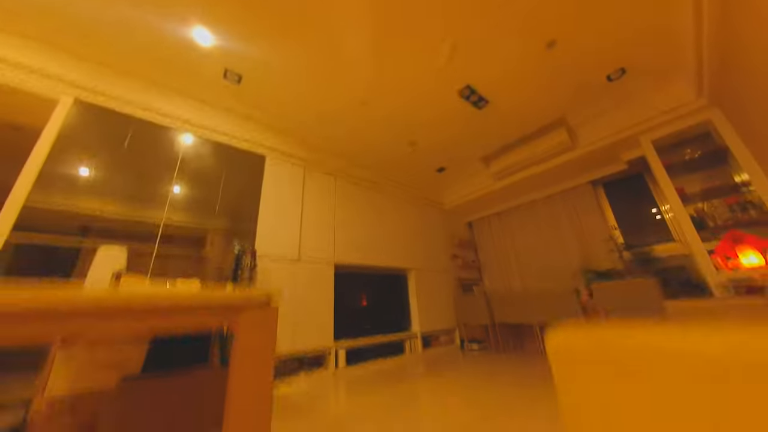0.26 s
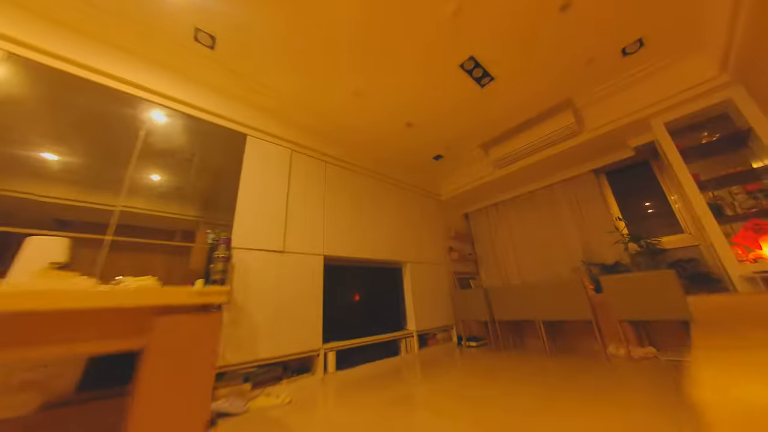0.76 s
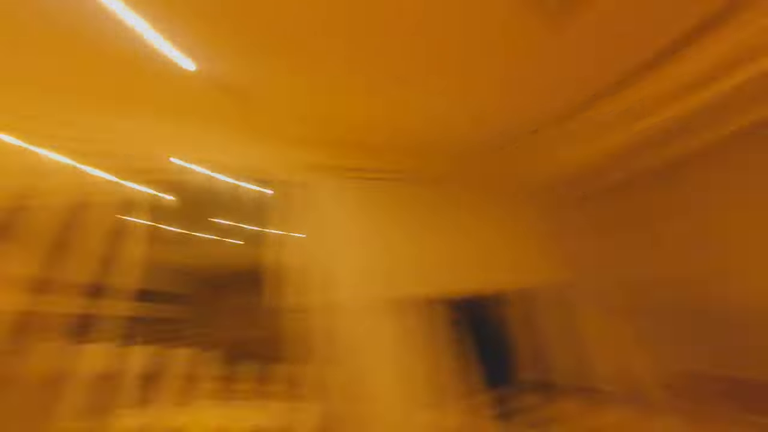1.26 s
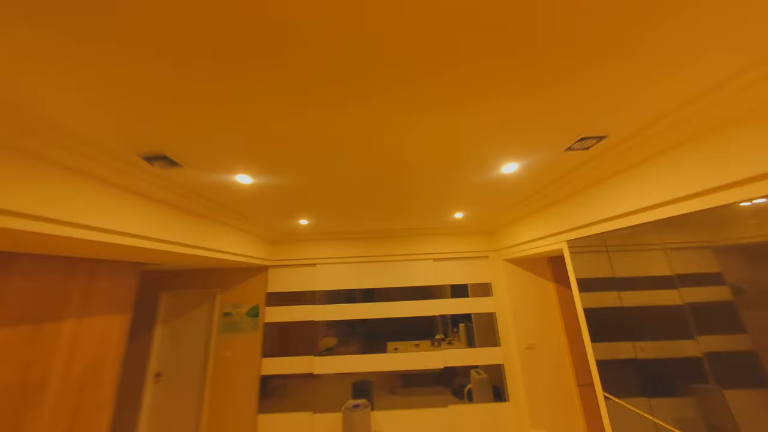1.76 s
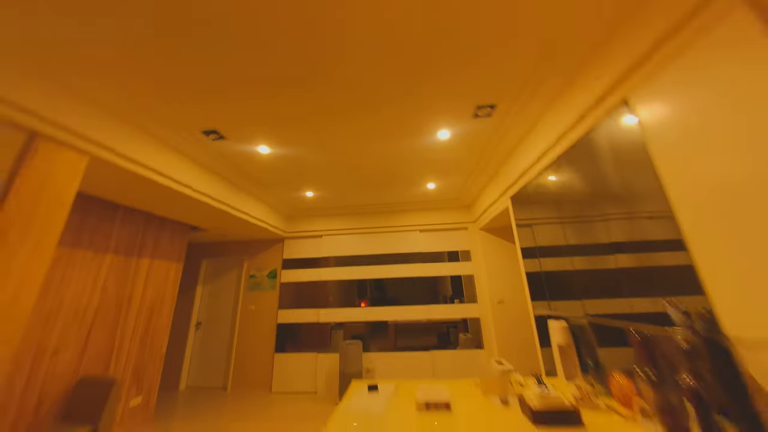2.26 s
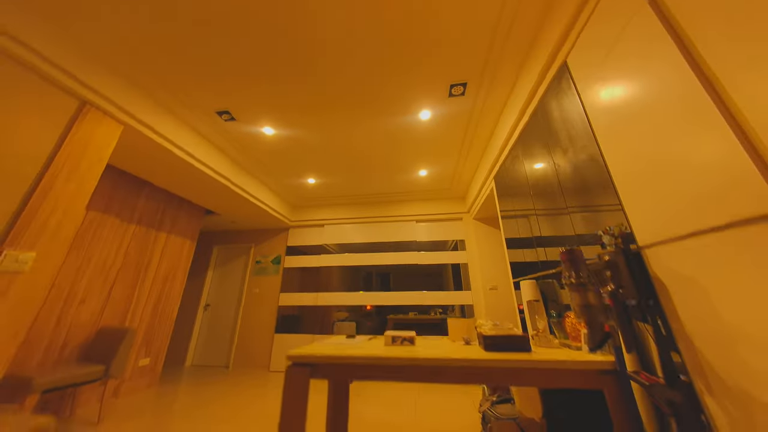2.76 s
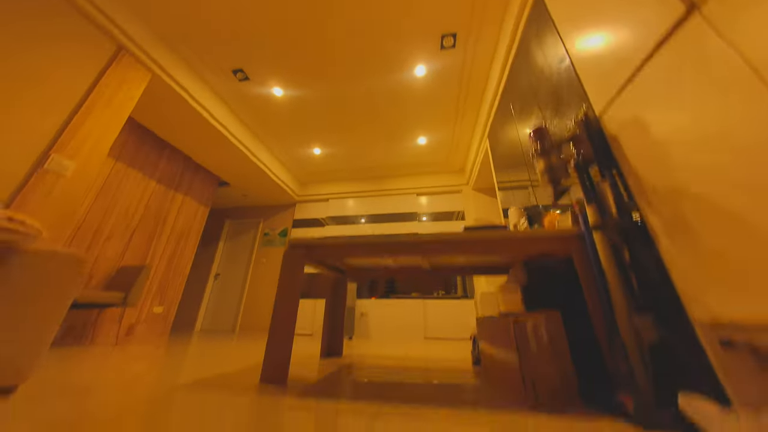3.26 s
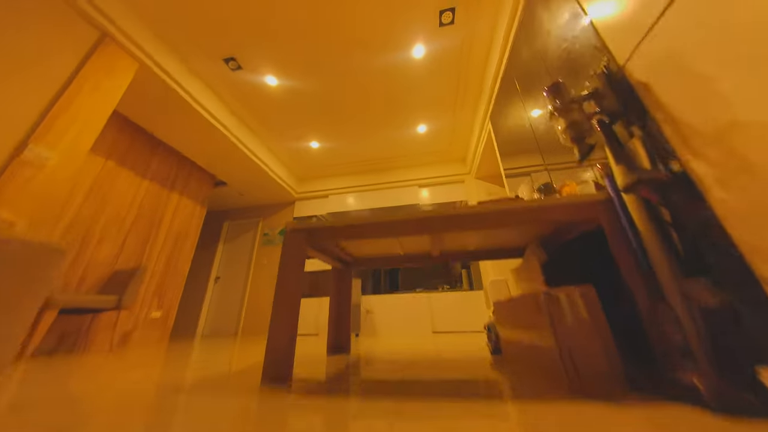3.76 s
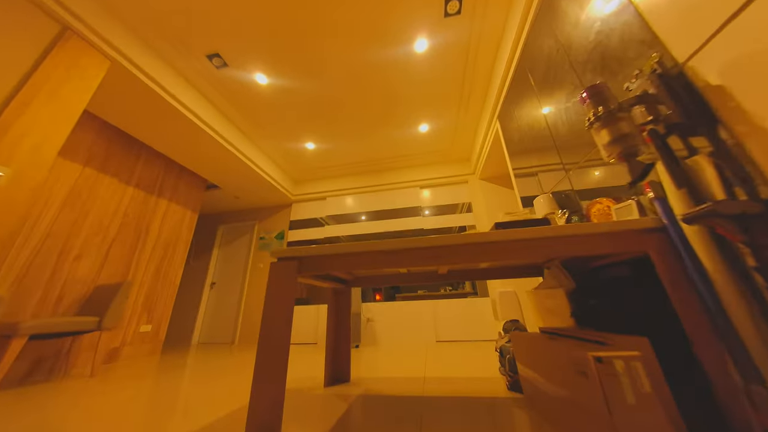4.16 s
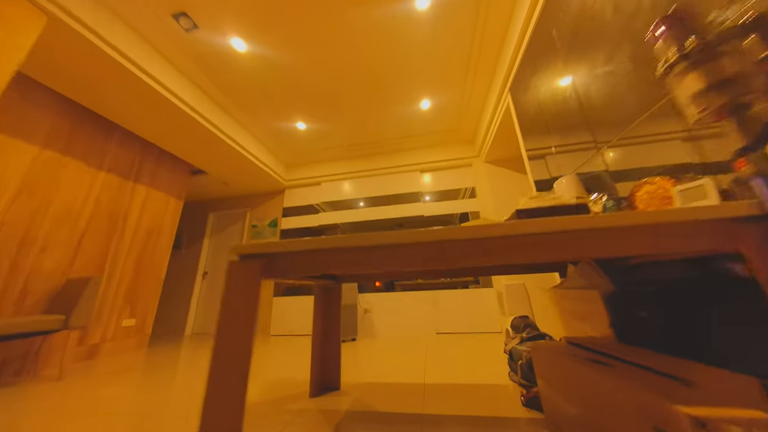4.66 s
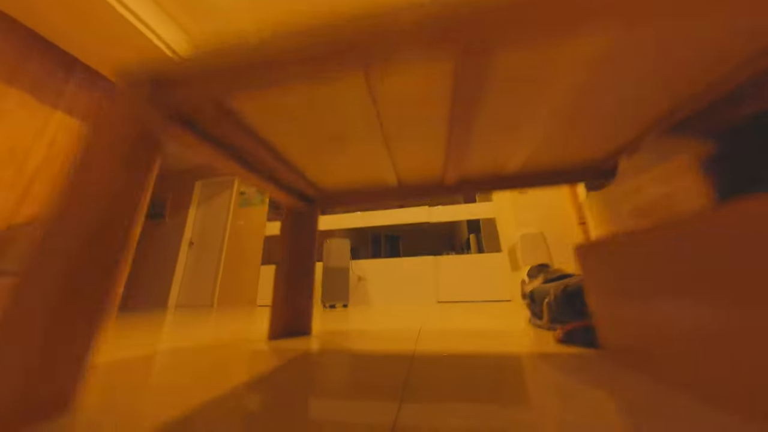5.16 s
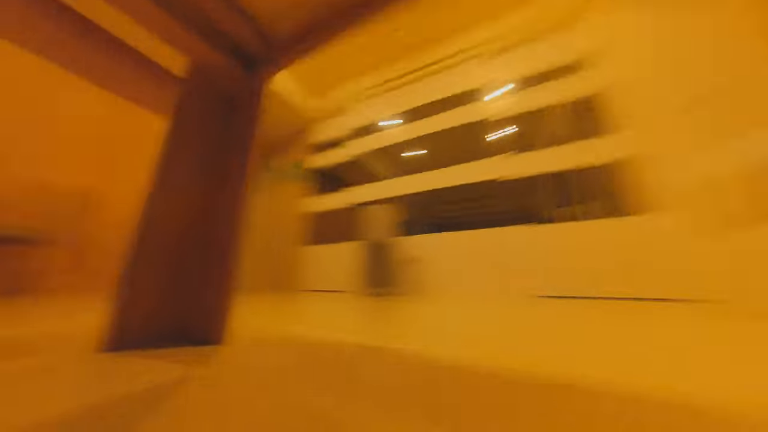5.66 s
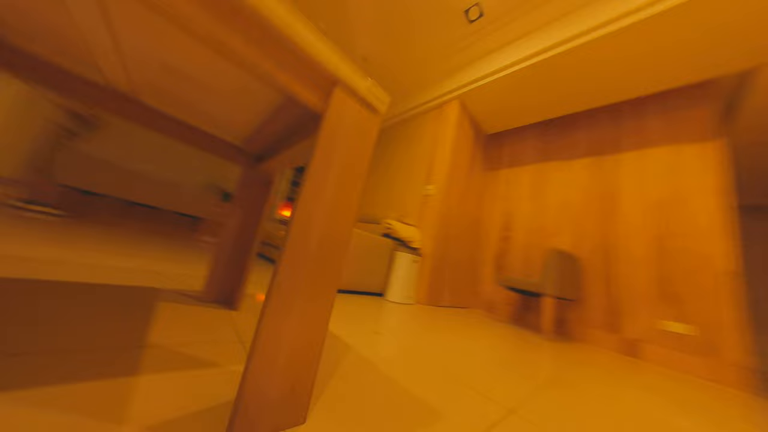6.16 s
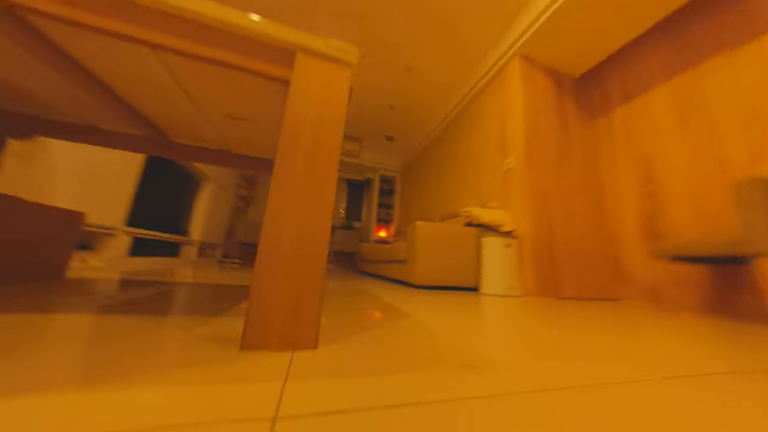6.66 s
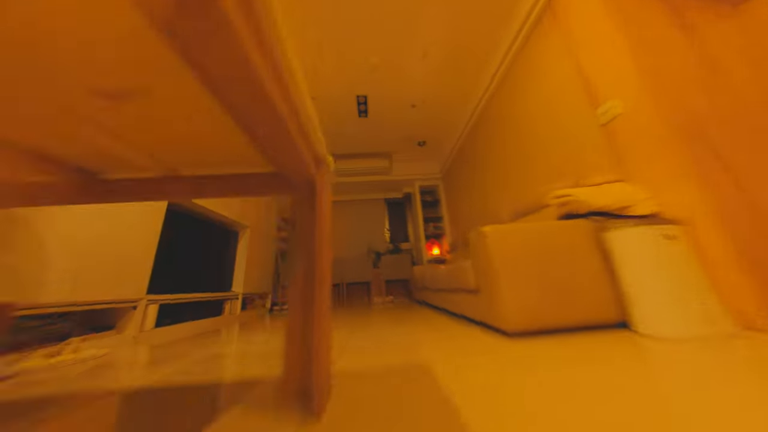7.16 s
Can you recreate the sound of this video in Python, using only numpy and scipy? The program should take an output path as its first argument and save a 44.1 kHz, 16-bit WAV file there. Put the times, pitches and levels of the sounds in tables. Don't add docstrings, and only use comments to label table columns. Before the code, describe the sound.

Close, overloaded propeller whine from a little indoor drone surges, beats and dips, with a throttle cut early on and gusty air rumble.

```python
import sys
import numpy as np
from scipy import signal
from scipy.fft import rfft, irfft
from scipy.io import wavfile
from scipy.ndimage import uniform_filter1d

SR = 44100
rng = np.random.default_rng(int(sys.argv[2]) if len(sys.argv) > 2 else 0)


def rack_gain(trim_db):
    fader = np.asarray(trim_db, float)
    return 10 ** (fader / 20)


def persist_wave(psi):
    counts = np.round(np.clip(psi, -1, 1) * 32767).astype(np.int16)
    wavfile.write(sys.argv[1], SR, np.atleast_2d(counts).T)


N = 326340

# one row of (bite in blade tone, sharpness
# in second harmonic, in third, bite in hiss, in bright fizz) [dB per dB]
BITE_SHARES = (0.3, 0.32, 1.2, 0.84, -0.34)


def rotor_pair(hz, third, bite_db, sharp_db, shake, gains_db, mate_db, apart, high_db):
    # (frequency [Hz], level [dB])
    tone = [(190, -35.5), (270, -29.5), (400, -29), (520, -23), (750, -17.5), (1000, -17), (1400, -12.5)]
    # (frequency [Hz], level [dB])
    ring = [(600, -57), (950, -25.5), (1200, -20.5), (1550, -12), (1950, -14.5), (2650, -30), (3300, -14),
            (4800, -12)]
    load_db_s = (-0.07, 0.3, 0.22)
    laws = (at_hz(tone, hz), at_hz(ring, 2 * hz), at_hz(third, 3 * hz))
    loading_db = (bite_db, sharp_db, sharp_db)
    unrest_db = (1.2, 1.8, 1.8)
    levels_db = []
    for k, law in enumerate(laws):
        level_db = law + gains_db[k] + BITE_SHARES[k] * loading_db[k]
        level_db = level_db + load_db_s[k] * surge(hz) + unrest_db[k] * drift(5.9)
        levels_db.append(level_db)
    off_db = -16.5 * np.abs(np.log2(hz / 800))
    near, phase = rotor(hz, *levels_db, wobble=.005 * shake, flutter_db=1.5,
                        high_db=high_db + .6 * sharp_db, fall_db=1.5, shaft_db=off_db - 15)
    mate_hz = hz * (1 - apart * shake * (1 + .5 * drift(2.5)))
    far, _ = rotor(mate_hz, *(np.array(levels_db) + mate_db), wobble=.008 * shake, flutter_db=4.0,
                   high_db=high_db, fall_db=9.0, shaft_db=off_db - 17.5)
    return near + far, phase


def rotor(hz, tone_db, second_db, third_db, wobble, flutter_db, high_db, fall_db, shaft_db):
    # (frequency [Hz], level [dB])
    housing = [(300, -8), (900, -4), (1600, 0), (2100, -2), (2750, -20), (3500, -8), (4600, 0), (5600, -1),
               (6600, -5), (7500, -14), (10500, -20), (16000, -34)]
    blades, overtones = 3, 12
    whine_orders, whine_db = (6, 7), 5
    unsteady_hz = hz * (1 + wobble * drift(45) + .0055 * drift(250))
    phase = 2 * np.pi * (np.cumsum(unsteady_hz) / SR + rng.random())
    out = rack_gain(tone_db + shaft_db + 4.5 * drift(5)) * np.sin(phase / blades)
    for k, level_db in enumerate((tone_db, second_db, third_db), start=1):
        out += rack_gain(level_db + flutter_db * k ** 0.11 * drift(36.65)) * np.sin(k * phase + k * k)
    load_db = uniform_filter1d(tone_db, size=6000)
    for k in range(4, overtones + 2):
        level_db = load_db + high_db - fall_db * np.log2(k / 4)
        level_db = level_db + whine_db * (k in whine_orders) + at_hz(housing, k * hz)
        audible = k * hz < 16000
        out += rack_gain(level_db + 2 * flutter_db * drift(50)) * np.sin(k * phase + k * k) * audible
    return np.sqrt(2) * out, phase


def blade_rates():
    # (time [s], blade rate of first pair [Hz], of second pair [Hz])
    stick = [(0.0, 959, 926), (.1, 506, 493), (.165, 397.8, 418.6), (.31, 708, 697), (.4, 926, 900),
             (.55, 1343, 1161), (.71, 629, 513.7), (.8, 733, 646), (1.01, 830, 706), (1.18, 1200, 1044),
             (2.34, 880, 925), (2.52, 814.3, 815), (2.68, 876, 857.6), (2.79, 580, 590),
             (2.88, 452.3, 469.8), (3.07, 750, 733), (3.24, 913, 820.5), (3.4, 810.6, 715),
             (4.08, 708, 582.6), (4.29, 830.4, 752.7), (4.68, 762.4, 677), (4.85, 645.8, 600),
             (4.98, 593.6, 574), (5.23, 948, 855.4), (5.4, 904, 799.4), (6.55, 620, 633.7),
             (6.74, 838, 873), (7.09, 812, 810.3), (7.21, 746, 716.7), (7.4, 768.5, 686)]
    spin = [
        (1.3, 1023, 802),
        (1.34, 1615, 506),
        (1.37, 1540, 319.6),
        (1.4, 1318, 286.7),
        (1.44, 971.1, 579.3),
        (1.48, 494, 679.1),
        (1.521, 361.4, 721.3),
    ]
    coast = [
        (1.57, 279.5, 688.7),
        (1.65, 200.8, 505),
        (1.72, 270, 509),
        (1.82, 194, 446),
        (1.93, 194.2, 385),
        (2.0, 250.3, 449.4),
        (2.05, 375, 545),
        (2.19, 590.4, 636.2),
    ]
    kick = [
        (3.5, 845, 724),
        (3.615, 887, 738.6),
        (3.637, 905, 1047),
        (3.7, 829.5, 886),
        (3.79, 800, 738),
    ]
    turn = [
        (5.54, 732, 625.3),
        (5.64, 696, 589),
        (5.77, 992, 528.3),
        (5.91, 952.6, 700),
        (6.02, 835, 840.4),
        (6.2, 720.6, 800),
        (6.33, 598, 651.7),
        (6.44, 569, 616),
    ]
    s, first, second = np.transpose(sorted(stick + spin + coast + kick + turn))
    return [uniform_filter1d(eased(s, hz), size=400) for hz in (first, second)]


def surge(hz):
    return np.clip(uniform_filter1d(np.gradient(np.log2(hz)) * SR, size=3000), -3.5, 6)


def noise_levels(hz, bite_db):
    # (blade rate [Hz], blade hiss [dB], bright fizz relative to it [dB], wash [dB], #
    # buffet [dB])
    noise_law = [(323, -30.5, -31, -38, -43), (475, -20, -11.5, -38, -48), (600, -15, -11.5, -40, -42),
                 (806, -11, -7.5, -30.5, -41.5), (900, -11.5, -4.5, -29, -38.5),
                 (1200, -13.5, -1.5, -30.5, -39)]
    surge_db_s = (0.21, -0.14, 0.18)
    law = np.array(noise_law)
    hiss_db, top_db, wash_db, buffet_db = (at_hz(law[:, [0, k]], hz) for k in range(1, 5))
    hiss_more, top_more, wash_more = (db * surge(hz) for db in surge_db_s)
    hiss_db = hiss_db + hiss_more + BITE_SHARES[3] * bite_db
    top_db = top_db + top_more + BITE_SHARES[4] * bite_db
    return hiss_db, top_db, wash_db + wash_more, buffet_db


def blade_hiss(phases, hiss_db, top_db, chop):
    # (frequency [Hz], density [dB per Hz])
    hiss = [(180, -27), (300, -14), (509, -13), (653, -15.5), (1650, 0.5), (2050, -4.5), (2580, -27),
            (3420, -5.5), (4760, 1), (7190, -14), (9690, -15.5), (10500, -10.5), (12000, -25.5),
            (14200, -23), (15700, -27)]
    # (frequency [Hz], density [dB per Hz])
    top_hiss = [(500, -6), (1100, -8), (2700, -4), (5000, -10), (7200, -1.5), (9400, -4), (10600, -1.5),
                (12700, -8.5), (14300, -6), (15700, -9.5)]
    out = 0
    for spectrum, level_db in ((hiss, hiss_db), (top_hiss, hiss_db + top_db + 3.5)):
        puffs = sum(rack_gain(chop * np.cos(phase)) * rng.standard_normal(N) for phase in phases)
        out = out + rack_gain(level_db + 1.05 * drift(7.9)) * coloured(puffs, spectrum)
    return out


def prop_wash(wash_db, buffet_db):
    # (frequency [Hz], density [dB per Hz])
    wash_spectrum = [(55, -5), (90, 1.5), (200, -1.5), (400, -6.5), (800, -2.5)]
    wash = rack_gain(wash_db + 4.5 + 0.83 * drift(10.0)) * coloured(rng.standard_normal(N), wash_spectrum)
    buffet = coloured(rng.standard_normal(N), [(18, -5), (35, -17), (60, -11.5)])
    return wash + rack_gain(buffet_db + 2.5) * buffet


def gusts():
    # (time [s], length [s], wash
    # [dB], buffet [dB], extra speed wobble [multiple])
    air_events = [(0.463, 0.12, 1, 3, .1), (.97, .12, 2, 8, .1), (1.33, .08, -1, 15, .3),
                  (1.48, .13, 12, 24.5, 3), (1.685, 0.16, 2, 15, .3), (2.14, 0.21, 1, 17, .6),
                  (3.66, .2, 7, 10, 3), (4.269, .2, -2, 0, .3), (4.661, 0.18, -2, 4, .1),
                  (5.438, 0.24, 4, 13, .6), (5.66, .3, 5.5, 10, .6), (5.913, 0.36, 2.5, 13, 1.5),
                  (6.151, .3, 2.5, 7, .6), (6.9, .5, -0.5, 3, 1.5), (7.189, 0.33, 3.5, 2, .3)]
    t = np.arange(N) / SR
    total = 0
    for s, length, *more in air_events:
        swell = np.cos(np.pi * np.clip((t - s) / length, -.5, .5)) ** 2
        total = total + swell * np.array(more)[:, None]
    return total


def thrifty_stereo(mono):
    # (frequency [Hz], level [dB])
    side_share = [(30, -29), (300, -23.5), (700, -37), (1600, -26), (2700, -19.5), (4500, -15), (8000, -7),
                  (13000, -2)]
    # (frequency [Hz], level under which a line is dropped [dB],
    # level under which a band turns mono [dB])
    thrift = [(300, -90, -48), (1500, -70, -36), (2700, -49, -44), (4500, -54, -46), (7500, -51, -41),
              (11000, -54, -47), (12800, -49.5, -47), (14300, -55, -49)]
    hz, _, lines = signal.stft(mono, SR, nperseg=1024)
    hz, rows = np.maximum(hz, 1)[:, None], np.array(thrift)
    band = np.arange(len(hz)) // 12
    size = uniform_filter1d(uniform_filter1d(np.abs(lines), size=5, axis=0), size=5, axis=1)
    luck_db = rng.normal(0, 5.4, (band[-1] + 1, lines.shape[1] // 2 + 1))
    luck_db = np.repeat(luck_db, 2, axis=1)[band, :lines.shape[1]]
    loudness = np.sqrt(np.sum(size ** 2, axis=0))
    luck_db = luck_db + 10 * np.log10(loudness / np.median(loudness) + 1e-9)
    lines = lines * (np.abs(lines) > rack_gain(at_hz(rows[:, [0, 1]], hz) + luck_db))
    busy = size > rack_gain(at_hz(rows[:, [0, 2]], hz) + luck_db)
    random_turn = np.exp(2j * np.pi * rng.random(lines.shape))
    side = size * busy * rack_gain(at_hz(side_share, hz)) * random_turn
    mid, side = (signal.istft(z, SR, nperseg=1024)[1][:N] for z in (lines, side))
    return np.stack([mid + side, mid - side])


def at_hz(points, hz):
    return np.interp(np.log(hz), np.log(np.array(points)[:, 0]), np.array(points)[:, 1])


def rms_one(x):
    return x / np.sqrt(np.mean(x ** 2) + 1e-20)


def drift(rate):
    r = np.exp(-40 * np.pi * rate / SR)
    slow = signal.lfilter([1], [1, -2 * r, r * r], rng.standard_normal(N // 20 + 2002))[2000:]
    return np.interp(np.arange(N) / 20, np.arange(len(slow)), rms_one(slow))


def coloured(x, spectrum):
    hz = np.maximum(np.arange(N // 2 + 1) * SR / N, 1)
    below = [(1, -80), (spectrum[0][0] / 2, -40)]
    above = [(spectrum[-1][0] * 1.3, -60)]
    shape = below + list(spectrum) + above
    return rms_one(irfft(rfft(x) * rack_gain(at_hz(shape, hz)), N))


def eased(s, value):
    step = np.diff(s) + 1e-6
    slope = np.diff(value) / step
    product = slope[1:] * slope[:-1]
    inner = np.where(product > 0, 2 * product / (slope[1:] + slope[:-1] + 1e-9), 0)
    slope = np.r_[slope[0], inner, slope[-1]]
    t = np.arange(N) / SR
    i = np.clip(np.searchsorted(s, t) - 1, 0, len(s) - 2)
    u = np.clip((t - s[i]) / step[i], 0, 1)
    ease = u * u * (3 - 2 * u)
    bend = step[i] * u * (1 - u) * ((1 - u) * slope[i] - u * slope[i + 1])
    return value[i] + ease * (value[i + 1] - value[i]) + bend


def scene():
    # (time [s], overall bite [dB], sharpness of first pair [dB], of second pair [dB])
    bite = [(0.0, 2.5, -16, -9), (.15, 0, -13, -7), (.33, -1.5, 1, -1), (.55, 0.3, -1.5, -7),
            (1.0, 0.6, -3.3, -1), (1.42, -1.3, 0, -7), (1.58, 4.5, -2, -3), (1.9, 4, 11, -3),
            (2.12, 1, -8, -1.5), (2.45, 1, -0.5, 0.5), (2.85, -1, 1, 2), (3.5, 1, -2.3, -.1),
            (4.1, -1, -2.5, 1), (4.7, -0.5, -0.5, 0), (5.3, 0.3, -17, 3), (5.7, 1.5, -0.5, -2),
            (6.45, 0, -2.5, -2.5), (7.4, 1.3, -4.5, -2.5)]
    # (frequency [Hz], level [dB])
    third_a = [(600, -67), (1200, -26), (1600, -13), (1950, -16), (2200, -26), (2800, -26), (3500, -17),
               (4100, -14.5)]
    third_b = [(800, -50), (1200, -27), (1500, -22), (1780, -17), (2150, -23), (2500, -27.5), (3000, -28),
               (3500, -26)]
    first, second = blade_rates()
    s, *loading = np.transpose(bite)
    bite_db, sharp_a_db, sharp_b_db = (np.interp(np.arange(N) / SR, s, db) for db in loading)
    gust_wash_db, gust_buffet_db, wobble = gusts()
    shake = 1 + np.maximum(wobble, 0)
    a, phase_a = rotor_pair(first, third_a, bite_db, sharp_a_db, shake, gains_db=(-.1, -.3, -.3),
                            mate_db=-7.5, apart=.03, high_db=-9.5)
    b, phase_b = rotor_pair(second, third_b, bite_db, sharp_b_db, shake, gains_db=(-2.2, -7.5, -.3),
                            mate_db=-3.5, apart=-.025, high_db=-10.5)
    air_hz = ((first ** 4 + second ** 4) / 2) ** .25
    hiss_db, top_db, wash_db, buffet_db = noise_levels(air_hz, bite_db)
    hiss = blade_hiss((phase_a, phase_b), hiss_db, top_db, chop=4.7)
    wash = prop_wash(wash_db + gust_wash_db, buffet_db + gust_buffet_db)
    return np.stack([a + b + hiss + wash] * 2)


def roll_off(x):
    return signal.sosfilt(signal.butter(12, 15810, fs=SR, output="sos"), x)


def record(dry):
    overload = .84
    squashed = overload * np.tanh(rack_gain(1.5) * dry[0] / overload)
    mix = thrifty_stereo(squashed)
    return roll_off(mix)


dry = scene()
out = record(dry)
persist_wave(out)
```